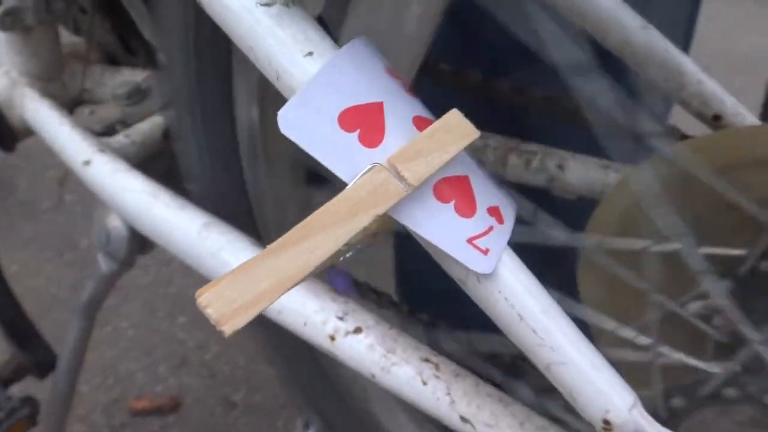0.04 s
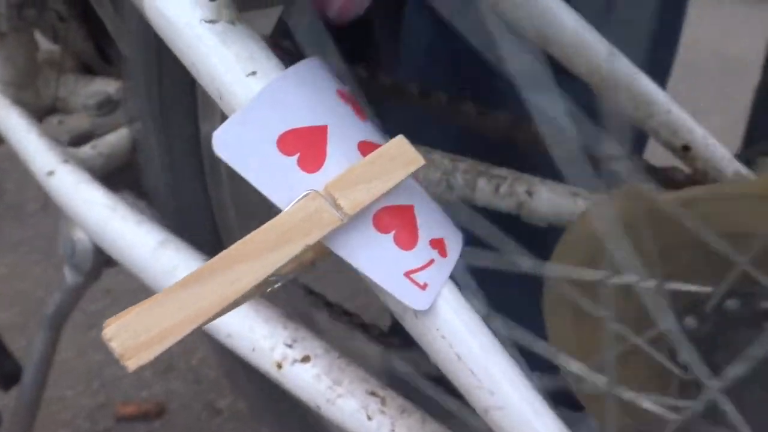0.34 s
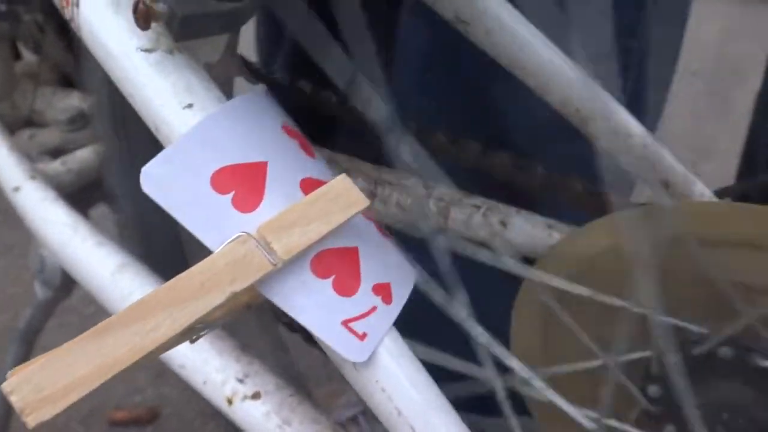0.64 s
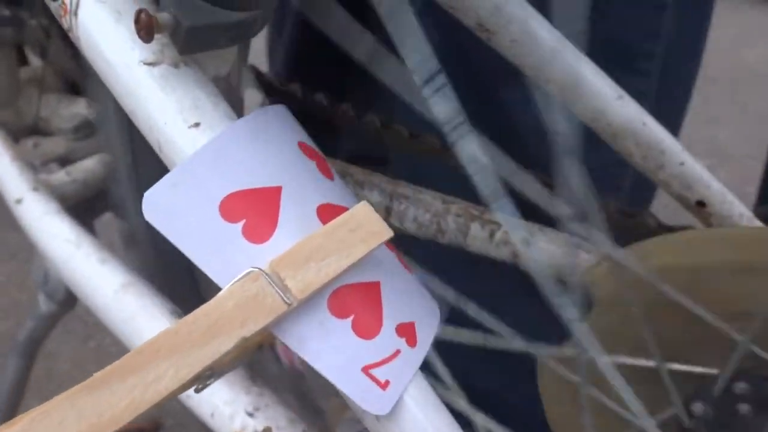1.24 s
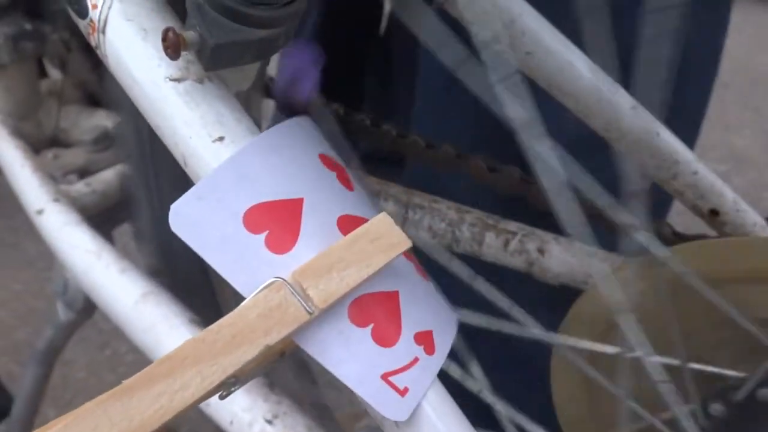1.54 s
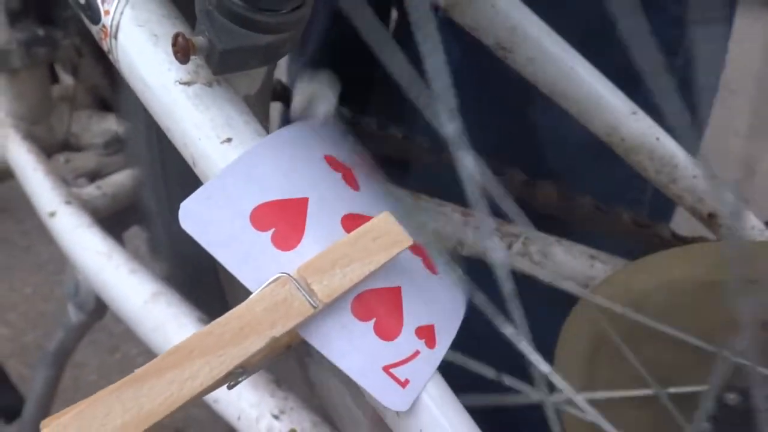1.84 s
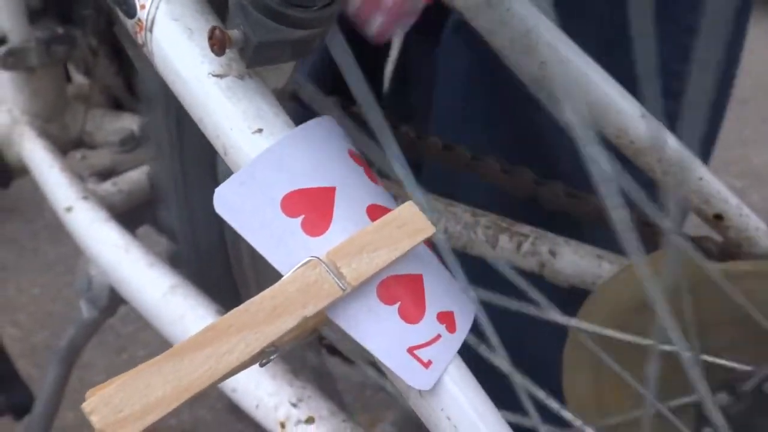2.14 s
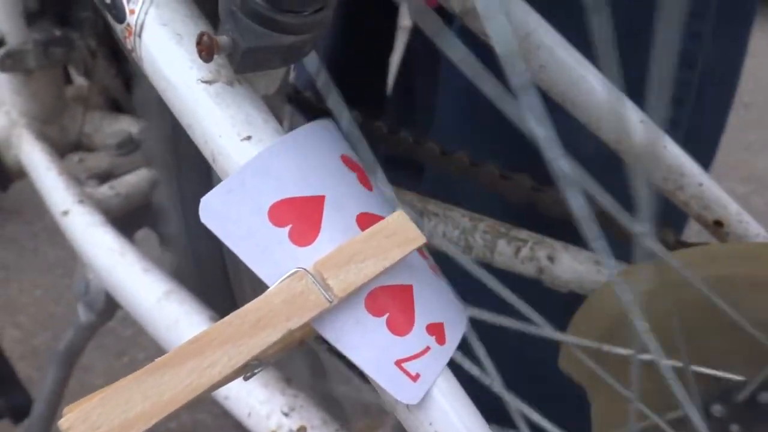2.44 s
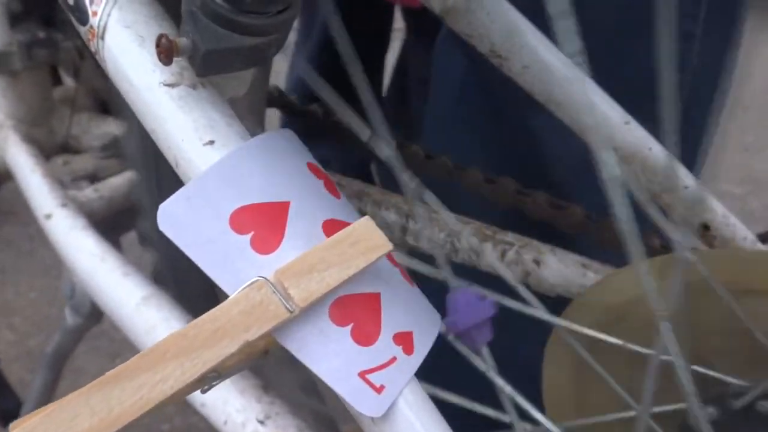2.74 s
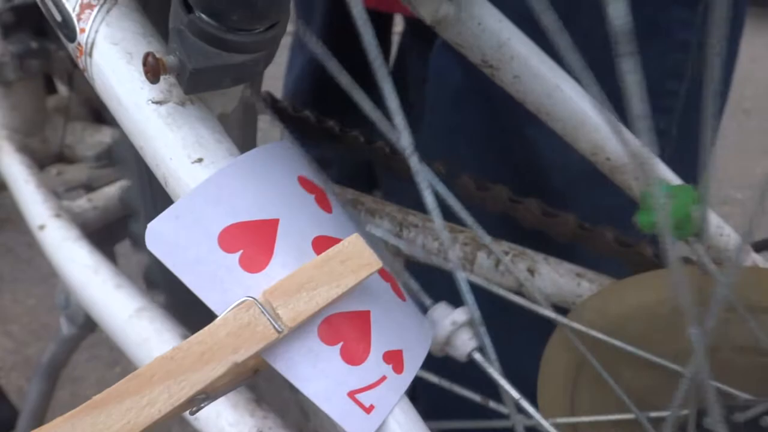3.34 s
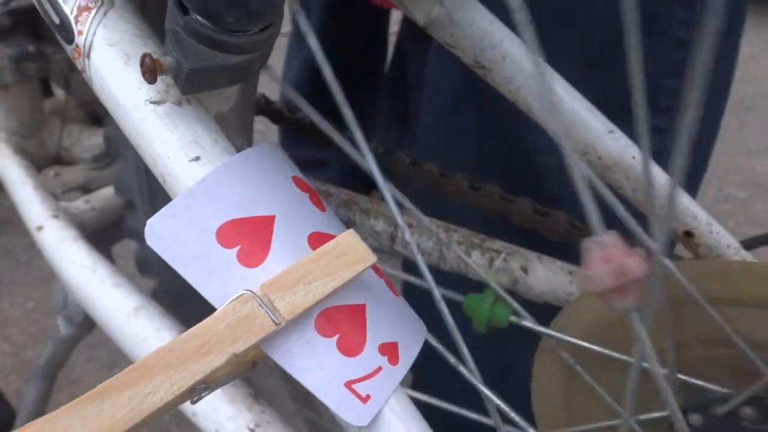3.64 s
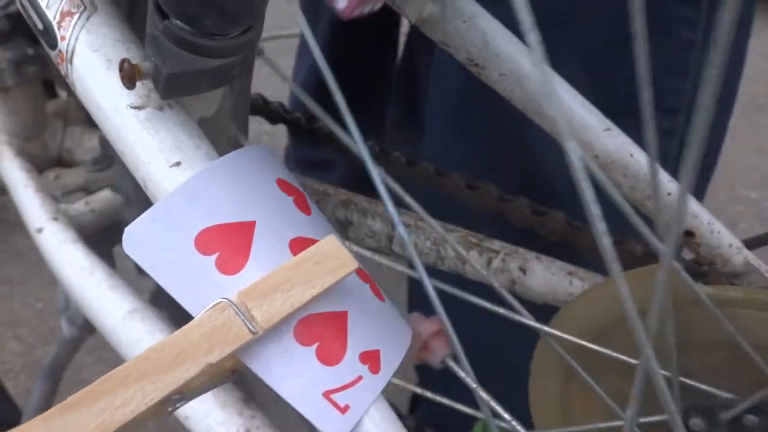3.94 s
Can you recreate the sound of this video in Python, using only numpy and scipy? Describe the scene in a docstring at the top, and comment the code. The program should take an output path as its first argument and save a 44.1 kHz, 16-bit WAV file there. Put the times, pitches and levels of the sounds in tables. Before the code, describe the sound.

A playing card snaps rapidly against bicycle spokes, the clicks gradually slowing.

```python
"""Papery snaps in quick pairs, close by: a slowing bicycle wheel flicks a playing card pegged to the frame.
The spokes come in pairs; each gives a snap and a knock, the card scrapes along it, and after the
second it flutters. Card, peg and frame ring briefly and the plucked spokes hum. Plastic beads rattle
faintly on the spokes; outdoors, with a short echo and a low background."""
import sys
import numpy as np
from scipy import signal
from scipy.fft import rfft, irfft, next_fast_len
from scipy.io import wavfile
from scipy.ndimage import map_coordinates

SR = 44100
rng = np.random.default_rng(int(sys.argv[2]) if len(sys.argv) > 2 else 0)


def dump(signal):
    """Clip the signal to [-1, 1] and save it as 16-bit WAV at the path in sys.argv[1]."""
    limited = np.clip(np.atleast_2d(signal).T, -1, 1)
    pcm = np.round(limited * 32767).astype(np.int16)
    wavfile.write(sys.argv[1], SR, pcm)


N = 176400
TOP_HZ, GRAIN_DB = 10900, 2.2  # band limit; roughness of the card's slips

# The pairs of spokes that hit the card, levels in relative dB. Each row: the first spoke's start in
# seconds, snap and scrape; then the second's start in seconds, snap, knock over snap, flutter and scrape.
PAIRS = [(.0159, -16.5, -38, .0402, -14, -20, -25, -39), (.0891, -15.5, -30, .1182, -21, -25, -30, -42),
         (.1628, -17.5, -42, .1878, -15, -24, -25, -38), (.2383, -16.5, -42, .2634, -14, -20, -26, -39),
         (.3146, -16.5, -42, .3397, -15, -21, -24, -42), (.3917, -15.5, -42, .4167, -13, -21, -25, -43),
         (.4705, -15.5, -37, .4964, -13, -21, -24, -45), (.5519, -14.5, -42, .5787, -13, -19, -24, -44),
         (.6345, -14.5, -38, .6618, -12, -19, -26, -44), (.7204, -14.5, -40, .7485, -13, -20, -27, -45),
         (.8086, -15.5, -38, .8383, -23, -16, -29, -43), (.8981, -14.5, -45, .927, -13, -19, -25, -41),
         (.9903, -15.5, -44, 1.0196, -13, -22, -24, -45), (1.0841, -14.5, -44, 1.1137, -13, -19, -25, -43),
         (1.1794, -15.5, -44, 1.2091, -13, -20, -25, -38), (1.2774, -15.5, -41, 1.3086, -12, -21, -27, -38),
         (1.3786, -14.5, -37, 1.4118, -14, -20, -26, -37), (1.4843, -14.5, -40, 1.5172, -14, -19, -26, -37),
         (1.5947, -13.5, -40, 1.6288, -13, -19, -29, -38), (1.7096, -14.5, -36, 1.7452, -23, -22, -38, -60),
         (1.83, -14.5, -43, 1.865, -12, -18, -26, -38), (1.9513, -15, -39, 1.9883, -14, -18, -26, -36),
         (2.0774, -14.5, -38, 2.1157, -14, -23, -45, -60), (2.2079, -17, -42, 2.2488, -15, -20, -23, -42),
         (2.3474, -14.5, -42, 2.3893, -14.5, -20, -25, -43),
         (2.4964, -15.5, -44, 2.5422, -14, -22, -27, -43),
         (2.6585, -15.5, -44, 2.707, -13.5, -22, -31, -41), (2.8368, -14, -44, 2.89, -14, -22, -26, -42),
         (3.0335, -15.5, -43, 3.1307, -19, -26, -39, -39), (3.2477, -15, -45, 3.3107, -15, -20, -33, -41),
         (3.4641, -15, -41, 3.533, -15, -20, -41, -40), (3.7314, -15, -45, 3.812, -14.5, -20, -46, -48)]
# The colour of the card's edge rubbing on a spoke. Each row: frequency in Hz, level in dB.
EDGE_COLOUR = [(100, -33.5), (230, -15.5), (450, -24), (850, -17.5), (1600, -19.5), (2300, -10.5),
               (3700, -5), (5000, -3.5), (7000, -5), (7900, 1.5), (9500, -7), (10400, 4), (11200, -10)]


def amp(db):
    """Decibels to gain."""
    return 10 ** (np.asarray(db) / 20)


def along(points, hz):
    """Read a curve of (Hz, value) points on a log frequency axis."""
    freqs, values = np.transpose(points)
    return np.interp(np.log(hz + 1), np.log(freqs + 1), values)


def filtered(x, response):
    """Multiply the spectrum of x by a complex response of frequency."""
    size = next_fast_len(N + SR // 2)
    return irfft(rfft(x, size) * response(np.fft.rfftfreq(size, 1 / SR)), size)[..., :N]


def coloured(x, colour, size=2048):
    """A minimum-phase equaliser that keeps the audible power of white noise."""
    hz = np.fft.rfftfreq(size, 1 / SR)
    gain = amp(along(colour, hz))
    gain = gain / np.sqrt(np.mean(gain ** 2 * (hz < TOP_HZ)))
    cepstrum = irfft(np.log(gain))
    fold = np.r_[1, np.full(size // 2 - 1, 2), 1, np.zeros(size // 2 - 1)]
    impulse = irfft(np.exp(rfft(cepstrum * fold)))
    return signal.fftconvolve(x, impulse[None], axes=1)[:, :N]


def wobble(rate):
    """A smooth random curve, rate knots a second."""
    return map_coordinates(rng.standard_normal(int(N * rate / SR) + 4), [np.arange(N) * rate / SR])


def burst(start, hold, t60):
    """An envelope with an instant attack, a hold and an exponential release, all in seconds."""
    out, i = np.zeros(N), max(round(start * SR), 0)
    t = np.arange(min(SR // 3, N - i)) / SR
    out[i:i + len(t)] = amp(-60 * np.maximum(t - hold, 0) / t60)
    return out


def crackle(envelope, colour, grain_db=GRAIN_DB):
    """Tiny slips of the card's edge: grainy mid and side noise under one envelope."""
    grain = amp(grain_db * wobble(1500))
    return coloured(rng.standard_normal((2, N)) * envelope * grain / np.sqrt(np.mean(grain ** 2)), colour)


def slap(start, hold, t60, colour, ripple_db=1.8, colour_spread=.067, bands=30, size=3072):
    """One contact: a brief cluster of slips, coloured anew by where the spoke meets the card."""
    t, hz = np.arange(size) / SR, np.geomspace(20, SR / 2, 200)
    band_db = ripple_db * np.r_[0, rng.standard_normal(bands - 1)]
    ripple = np.column_stack([np.geomspace(1000, TOP_HZ, bands), band_db])
    grain = amp(GRAIN_DB * np.repeat(rng.standard_normal(size // 32), 32))
    envelope = amp(-60 * np.maximum(t - hold, 0) / t60)
    slips = rng.standard_normal((2, size)) * grain / np.sqrt(np.mean(grain ** 2)) * envelope
    # each contact shifts the card's resonances, less so towards the top
    shift = np.exp(colour_spread * rng.standard_normal() * np.maximum(1 - (hz / TOP_HZ) ** 2, 0))
    sound = coloured(slips, np.column_stack([hz, along(colour, hz * shift) + along(ripple, hz)]))
    out = np.zeros((2, N + SR))
    out[:, round(start * SR):][:, :sound.shape[1]] = sound
    return out[:, :N]


def background(level_db=-58.5, width=.32):
    """A quiet outdoor bed of rumble and hiss."""
    # The colour of the bed. Each row: frequency in Hz, level in dB.
    air_colour = [(25, -3), (70, -1), (200, -1), (400, -15), (900, -13), (2000, -9), (10000, -9)]
    return amp(level_db) * coloured(rng.standard_normal((2, N)), air_colour) * np.array([[1], [width]])


def beads(per_s=90, softest_db=-53, centre_hz=5000, octaves=2, t60=.082, rise_s=.00053):
    """Plastic beads tick against each other at random, and one squeaks on its spoke."""
    # A bead sliding down its spoke. Each row: start in seconds, level in dB.
    squeaks = [(3.112, -40), (3.186, -31)]
    squeak_hz, squeak_s = 2300, .018
    out, t = np.zeros((2, N + SR)), np.arange(SR // 20) / SR
    attack = 1 - np.exp(-t / rise_s)
    for when, size, *pitches in rng.random((int(per_s * N / SR), 6)):
        tick = attack * sum(np.sin(2 * np.pi * centre_hz * 2 ** (octaves * (p - .5)) * t) for p in pitches)
        out[0, int(when * N):][:len(t)] += amp(softest_db + 10 * size ** 2 - 60 * t / t60) * tick
    squeak = np.sin(np.pi * np.minimum(t / squeak_s, 1)) * np.sin(2 * np.pi * squeak_hz * t)
    for s, db in squeaks:
        out[0, round(s * SR):][:len(t)] += amp(db) * squeak
    return out[:, :N]


def snaps(gain_db=.5, t60=.033, first_hold=.0052, second_hold=.0075, shrink_per_s=.18):
    """The card slaps each spoke; the second of a pair is fuller and shortens as the wheel slows."""
    # The card's thin first snap and fuller second snap. Each row: frequency in Hz, level in dB.
    first_colour = [(200, -34), (1600, -30.5), (2650, -11), (3200, -16), (3550, -1.5), (4100, -7.5),
                    (5500, -5.5), (7800, -1.5), (9500, -6.5), (10400, 2), (11200, -11.5)]
    second_colour = [(200, -31.5), (1600, -20), (2800, -6.5), (3700, -2.5), (5000, -1), (6800, 0),
                     (7800, 1), (9500, -5.5), (10400, 6), (11200, -9)]
    first = sum(amp(db) * slap(s, first_hold, t60, first_colour) for s, db, *_ in PAIRS)
    second = sum(amp(db) * slap(s, second_hold * np.exp(-shrink_per_s * s), t60, second_colour)
                 for _, _, _, s, db, *_ in PAIRS)
    return amp(gain_db) * (first + second)


def scrape(swell_db=9, held_share=.73):
    """The bent card slides along a spoke, sticking and slipping ever harder until it comes off."""
    slides = [slide for s1, _, db1, s2, *_, db2 in PAIRS for slide in ((s1, db1), (s2, db2))]
    ends = [s for s, _ in slides[1:]] + [N / SR]
    t, contact = np.arange(N) / SR, np.zeros(N)
    for (s, db), end in zip(slides, ends):
        bend = np.clip((t - s) / (end - s), 0, 1) - .5
        contact += amp(db + swell_db * bend) * burst(s, (end - s) * held_share, t60=.1)
    sticking = amp(3.5 * wobble(260) + 2 * wobble(30))
    return crackle(contact * sticking, EDGE_COLOUR)


def spoke_hum(hz=865, wander_hz=55, spread_hz=20, gain_db=-37.5, waver_db=2.5):
    """The first spoke of each pair hums unevenly, at its own pitch, after the card has plucked it."""
    pitch = hz + wander_hz * np.array([wobble(120), wobble(120)])
    starts = [s for s, *_ in PAIRS]
    detune = np.interp(np.arange(N) / SR, starts, spread_hz * rng.standard_normal(len(PAIRS)))
    plucks = sum(amp(db + gain_db) * burst(s, hold=0, t60=.42) for s, db, *_ in PAIRS)
    phase = 2 * np.pi * np.cumsum(pitch + detune, axis=1) / SR
    return plucks * amp(waver_db * wobble(70)) * np.sin(phase)


def ringing(card, gain_db=-23.5):
    """Every contact sets the card, peg and frame ringing briefly, and the plucked spoke with them."""
    # Their resonances, the one near 880 Hz being the spoke's. Each row: frequency in Hz, relative level in dB,
    # time to fall 60 dB in seconds.
    resonances = [(260, -7, .03), (880, -6, .06), (2950, -5, .04), (3700, -7, .06), (4830, -3, .06),
                  (6400, 0, .03), (7850, 2, .033), (10380, -1, .08)]
    t = np.arange(SR // 3) / SR
    modes = sum(amp(db + gain_db - 60 * t / t60) * np.sin(2 * np.pi * hz * t)
                / np.sqrt(t60 * SR / np.log(1000)) for hz, db, t60 in resonances)
    return signal.fftconvolve(card, modes[None], axes=1)[:, :N]


def echo(wheel, level_db=-19.5):
    """A short diffuse answer from the bicycle and the ground."""
    # The echo's decay. Each row: frequency in Hz, time to fall 60 dB in seconds.
    decay = [(200, 0.3), (2000, 0.21), (10000, 0.021)]
    hz, t, noise = signal.stft(rng.standard_normal((2, SR // 3)), SR, nperseg=256)
    tail = signal.istft(noise * amp(-60 * t / along(decay, hz)[:, None]), SR, nperseg=256)[1]
    return amp(level_db) * signal.fftconvolve(wheel, tail / np.linalg.norm(tail[0]), axes=1)[:, :N]


def knocks(gain_db=2.5, body_db=-9.5, first_db=-28, slip_off_s=.003, width=1.6, thump_hz=75):
    """Each snap knocks the peg and frame: a pop, then a fading body. A few midway add a soft low thump."""
    # Low jolts of the frame. Each row: start in seconds, level in dB.
    thumps = [(1.024, -54), (1.3086, -44), (1.379, -46), (1.5172, -45), (1.83, -45), (1.866, -44),
              (2.3474, -50), (2.3893, -49), (2.4964, -49)]
    # The colour of a knock. Each row: frequency in Hz, level in dB.
    knock_colour = [(30, -13.5), (140, -11), (235, -1.5), (330, -2.5), (450, -4.5), (850, 0), (1600, 1.5),
                    (2500, 3), (5000, -57)]
    pop = lambda s: burst(s, hold=.0025, t60=.014) + amp(body_db) * burst(s, hold=0, t60=.13)
    first = sum(amp(db + first_db) * pop(s + slip_off_s) for s, db, *_ in PAIRS)
    second = sum(amp(db + knock_db) * pop(s) for _, _, _, s, db, knock_db, *_ in PAIRS)
    out = crackle(amp(gain_db) * (first + second), knock_colour, grain_db=3) * np.array([[1], [width]])
    t = np.arange(N) / SR
    for s, db in thumps:
        out[0] += amp(db) * burst(s, hold=.0037, t60=.035) * np.sin(2 * np.pi * thump_hz * (t - s))
    return out


def taps(gain_db=-1.5, graze_lead_s=.0043, graze_db=-45, rise_db_per_s=3.5):
    """Louder, distinct rebounds of the card after some snaps, and a graze before each second snap that grows as
    the wheel slows."""
    # Louder, distinct rebounds of the card against a spoke after a snap. Each row: start in seconds, relative
    # level in dB.
    touches = [(.1104, -22), (.137, -22), (0.8507, -15), (0.8685, -22), (1.1351, -21), (1.7288, -47),
               (1.7594, -19.5), (1.7997, -32), (1.8162, -26), (2.1865, -21), (2.5574, -20), (2.568, -19),
               (2.7245, -24), (2.7351, -19.5), (2.9102, -21), (3.026, -29), (3.0847, -20), (3.1133, -29.5),
               (3.218, -44), (3.331, -30), (3.393, -33), (3.557, -20), (3.5682, -18.5), (3.6454, -25),
               (3.664, -29), (3.8433, -22), (3.988, -30)]
    grazes = [(s - graze_lead_s, graze_db + rise_db_per_s * s) for _, _, _, s, *_ in PAIRS]
    return sum(amp(db + gain_db) * slap(s, hold=.002, t60=.026, colour=EDGE_COLOUR)
               for s, db in touches + grazes)


def frame_body(gain_db=-40, rise_db_per_s=4):
    """Each second snap carries a dull low body from the frame, stronger as the wheel slows."""
    # The dull colour of the frame. Each row: frequency in Hz, level in dB.
    frame_colour = [(100, -20), (190, -2), (260, 0), (400, -7), (700, -20), (2000, -50)]
    envelope = sum(amp(db + gain_db + rise_db_per_s * s) * burst(s, hold=0, t60=.13)
                   for _, _, _, s, db, *_ in PAIRS)
    return crackle(envelope, frame_colour)


def flutter(gain_db=2.5, rate_hz=115.6, depth_db=12, delay_s=.0125):
    """After each second snap the card chatters against the spoke in uneven, fading rebounds."""
    cycles = np.cumsum(rate_hz * amp(3.4 * wobble(80))) / SR
    rebounds = amp(depth_db * (.5 - cycles % 1))
    fade = sum(amp(db + gain_db) * burst(s + delay_s, hold=.0035, t60=.099)
               for _, _, _, s, _, _, db, _ in PAIRS)
    return crackle(fade * rebounds, EDGE_COLOUR)


def stereo_image(mid_side):
    """Mid and side become left and right; the treble leans to the right."""
    # How alike the channels are. Each row: frequency in Hz, likeness (1 is mono).
    likeness = [(100, 1), (250, 0.98), (500, 0.58), (1400, 0.55), (2300, 0.67), (3700, 0.87), (8000, 0.82),
                (9000, 1), (9450, 0.84), (10300, 0.91)]
    # The balance. Each row: frequency in Hz, left over right in dB.
    balance = [(200, -.5), (1400, 1), (3700, -1), (5000, -3.5), (7500, -4), (9200, -15.5), (9900, 0.5),
               (10500, -1)]
    # The phase between the channels. Each row: frequency in Hz, the left's lead in radians.
    lead = [(200, 0.7), (1500, -0.34), (6000, -0.67), (9000, 0.26), (9900, 0.8), (11000, 0.44)]
    width = lambda hz: np.tan(np.arccos(np.clip(along(likeness, hz), -1, 1)) / 2)
    mid, side = filtered(mid_side, lambda hz: np.array([np.ones_like(hz), width(hz)]))
    half = np.array([[.5], [-.5]])
    pan = lambda hz: amp(half * along(balance, hz)) * np.exp(1j * half * along(lead, hz))
    return filtered(np.array([mid + side, mid - side]), pan)


def scene():
    """Card, spokes, beads, echo and the outdoor background, mixed as mid and side, then spread."""
    card = snaps() + knocks() + frame_body() + flutter() + taps() + scrape()
    wheel = card + ringing(card) + spoke_hum() + beads()
    air = background()
    return stereo_image(wheel + echo(wheel) + air)


def record(dry, ceiling=.76):
    """Soft clipping rounds off the highest peaks, and a steep low-pass closes the top."""
    rounded = dry / (1 + np.abs(dry / ceiling) ** 4) ** (1 / 4)
    return filtered(rounded, lambda hz: 1 / np.sqrt(1 + (hz / TOP_HZ) ** 90))


dry = scene()
out = record(dry)
dump(out)
```